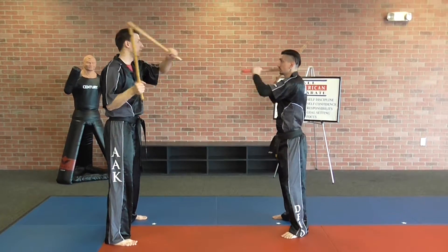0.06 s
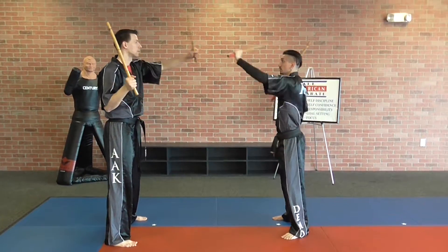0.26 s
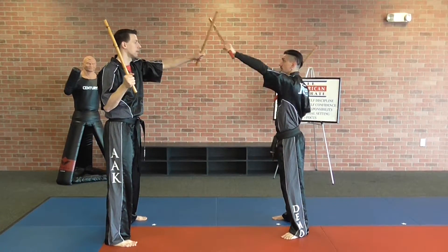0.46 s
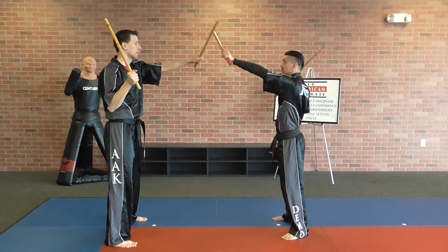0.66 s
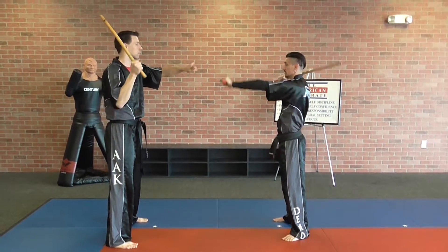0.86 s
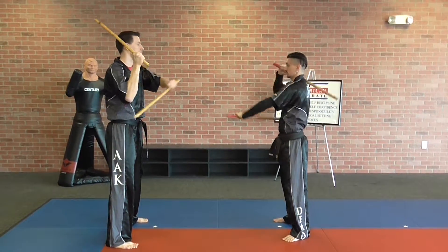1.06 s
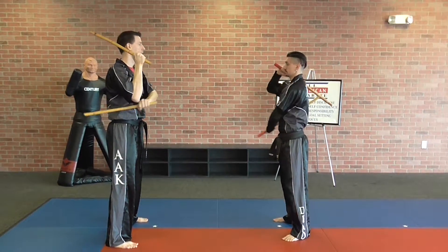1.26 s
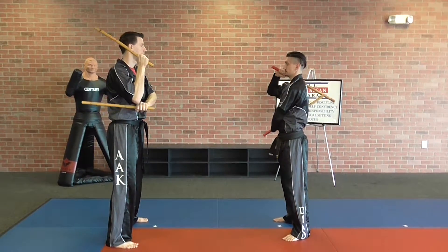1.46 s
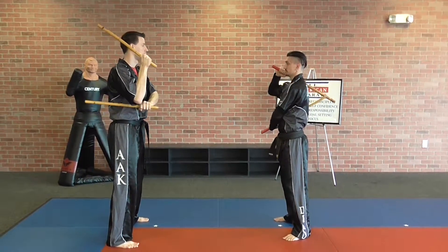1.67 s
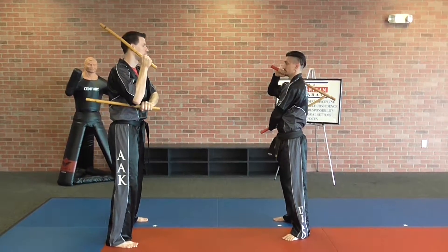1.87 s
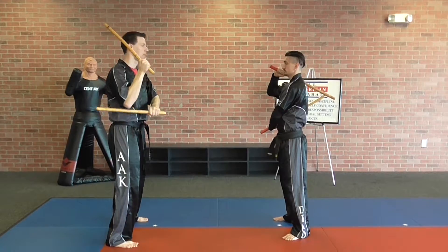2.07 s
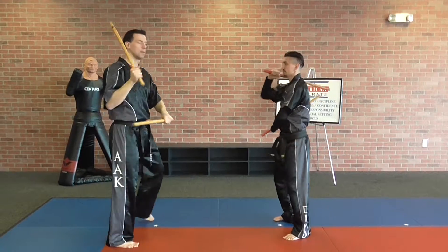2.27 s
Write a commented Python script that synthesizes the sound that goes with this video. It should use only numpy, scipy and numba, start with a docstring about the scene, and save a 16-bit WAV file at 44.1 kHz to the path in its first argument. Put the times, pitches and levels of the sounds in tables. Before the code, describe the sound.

Wooden sticks crack together twice, then clack softly, in an echoing training hall.

```python
"""Hard-walled training hall: two people drill with wooden sticks, two sharp cracks, then a dull clack.
Each contact cracks and rings the wood; the hall adds early echoes and a diffuse tail.
The loudest crack overloads the two microphones with a low thump; a faint hollow drone follows.
Uniforms swish and feet scuff the mat over ventilation rumble. Gain control ducks after each crack."""
import sys
import numpy as np
from scipy import signal
from scipy.fft import rfft, irfft
from scipy.io import wavfile
from numba import njit

SR = 44100
rng = np.random.default_rng(int(sys.argv[2]) if len(sys.argv) > 2 else 0)


def digitize_waveform(pressure):
    """Quantize a signal to 16-bit integers and store it at the path in sys.argv[1].

    Rows of a 2-D input are taken as channels; values are limited to [-1, 1].
    """
    field = np.atleast_2d(pressure).T
    bounded = np.clip(field, -1, 1)
    quanta = np.round(bounded * 32767).astype(np.int16)
    wavfile.write(sys.argv[1], SR, quanta)


N = 101429
BINS_HZ = np.fft.rfftfreq(N, 1 / SR)


def undb(db):
    """Decibels to gain."""
    return 10 ** (np.asarray(db) / 20)


def curve(points):
    """(f/Hz, value) points interpolated over log frequency at each FFT bin."""
    hz, values = np.array(points).T
    return np.interp(np.log(np.maximum(BINS_HZ, 1)), np.log(hz), values)


def noise(spectrum):
    """Unit-rms noise shaped by (f/Hz, relative density/dB) points."""
    x = irfft(rfft(rng.standard_normal(N)) * undb(curve(spectrum)), N)
    return x / x.std()


def stereo(mid, side):
    """Mid/side to left/right."""
    return np.array([mid + side, mid - side])


def delay(x, seconds):
    """Delayed signal, cut to N samples."""
    return np.concatenate([np.zeros(int(seconds * SR)), x])[:N]


def swell(t, peak, rise, fall):
    """Gaussian bump with separate rise and fall widths."""
    return np.exp(-.5 * ((t - peak) / np.where(t < peak, rise, fall)) ** 2)


def fade(t, t60):
    """Exponential decay, 60 dB in t60."""
    return np.exp(-np.log(1000) * t / t60)


# Rumble spectrum: f/Hz, level/dB
RUMBLE_SPECTRUM = [(15, -72.5), (25, -41), (45, -25), (87, -9), (108, -5), (149, 2), (185, -7.5), (242, -8),
                   (439, -18.5), (489, -22.5), (1020, -30.5), (1520, -39), (2760, -49.5), (5280, -49),
                   (16000, -50)]
# Rumble width: f/Hz, side re mid/dB
RUMBLE_WIDTH = [(60, -25), (200, -20), (380, -9), (700, -3), (1300, 2), (4400, 1.5), (8000, -3.5),
                (15000, -5)]
# Bass drift: t/s, level/dB
BASS_DRIFT = [(0, 12.5), (.11, 1), (.16, 0), (.27, -3.5), (.35, 2.5), (.45, -1), (.8, -2.5), (1.15, 0),
              (1.7, -2.5), (2.3, -4.5)]
# Motor hum: f/Hz, rms level/dB
MOTOR_HUM = [(59, -62), (120, -53), (238, -52.5)]


def ventilation(t, rumble_db=-43.5, bass_hz=300):
    """Air rumble with drifting, centred bass and wide hiss, plus motor hum."""
    side = irfft(rfft(noise(RUMBLE_SPECTRUM)) * undb(curve(RUMBLE_WIDTH)), N)
    air = stereo(noise(RUMBLE_SPECTRUM), side)
    bass = signal.sosfiltfilt(signal.butter(2, bass_hz, fs=SR, output="sos"), air)
    bass_gain = undb(np.interp(t, *np.array(BASS_DRIFT).T))
    air += bass * (bass_gain - 1)
    hum = sum(undb(db) * np.sqrt(2) * np.sin(2 * np.pi * (hz * t + rng.random())) for hz, db in MOTOR_HUM)
    return undb(rumble_db) * air + hum


# Wood contacts, rebounds included: t/s, level/dB, contact time/ms, striking spot 0-2
STICK_CONTACTS = [(.2050, -5.5, 0.057, 0), (.2080, 1.5, 0.06, 0), (.4821, 2.5, 0.012, 1),
                  (.4838, 5, 0.07, 1), (.4860, 5.5, 0.033, 1), (1.3597, -17.5, 0.081, 2),
                  (1.3665, -25, 0.12, 2), (1.3755, -26, 0.085, 2), (1.3845, -33, 0.1, 2),
                  (1.39, -28.5, .03, 2), (1.4485, -23, 0.27, 2)]
# Stick modes: f/Hz, t60/s, level/dB at spots 0, 1, 2
STICK_MODES = [(774.6, .025, -14.5, -20.5, -11), (938, .022, -25, -14, -7), (1204, 0.023, -31, -5.5, -11),
               (1440, 0.018, -14, -15.5, -6), (1642, .025, -19, -9, -11.5), (1955, .03, -19, -5.5, -9.5),
               (2121, .028, -23.5, -5, -23), (2505, .022, -9, -19, -18.5), (2981, 0.016, -22, -7, -28),
               (3640, 0.018, -20.5, -12, -34), (3855, .018, -6.5, -24, -41), (4190, 0.022, -5.5, -15, -41),
               (5116, 0.011, -3.5, -6.5, -37), (5675, 0.008, -7, -5.5, -36)]
# Splintery crack spectrum: f/Hz, level/dB at spots 0, 1, 2
CRACK_SPECTRA = [(100.6, -23.5, -9.5, -16), (380, -21, -12, -11), (673, -3, -2.5, 15), (2200, -1, 2.5, 5),
                 (3500, 3.5, 3, -12), (5050, 7.5, 7, 1), (7000, 4, 0.5, -6.5), (10340, -5.5, -1, -14),
                 (15200, 4, -8.5, -32)]


def sticks(t, ring_db=-4.5, crack_db=-4.5, crack_t60_s=.012):
    """Each contact cracks and rings the modes, neighbours in antiphase; longer contact is duller."""
    out, age = np.zeros(N), t[:SR // 8]
    for start, db, contact_ms, spot in STICK_CONTACTS:
        ring = sum((-1) ** n * undb(spot_db[spot]) * np.cos(2 * np.pi * hz * age) * fade(age, t60)
                   for n, (hz, t60, *spot_db) in enumerate(STICK_MODES))
        spectrum = [(hz, spot_db[spot]) for hz, *spot_db in CRACK_SPECTRA]
        crack = noise(spectrum)[:len(age)] * fade(age, crack_t60_s)
        pole = np.exp(-1e3 / (contact_ms * SR))
        blow = signal.lfilter([1 - pole], [1, -pole], undb(ring_db) * ring + undb(crack_db) * crack)
        out += undb(db) * delay(np.pad(blow, (0, N - len(age))), start)
    return out


# Floor, ceiling and wall reflections: delay/s, level/dB, pan (+1 left, -1 right)
REFLECTIONS = [(.0035, -21.5, 0.86), (.0063, -14, -.5), (.0100, -9.5, 0.45), (.0125, -10.5, -0.12),
               (0.0172, -10, .3), (.0180, -12.5, -0.061)]


def hall_echoes(x, cutoff_hz=7500):
    """Dulled first reflections from both sides."""
    dull = signal.sosfilt(signal.butter(2, cutoff_hz, fs=SR, output="sos"), x)
    return sum(undb(db) * delay(dull, lag) * stereo([1], np.array([pan])) for lag, db, pan in REFLECTIONS)


# Tail decay: f/Hz, t60/s
TAIL_DECAY = [(150, 0.87), (600, 0.69), (1500, 0.5221), (4000, 0.6422), (5800, 0.5933), (7500, 0.5),
              (10000, 0.45), (14000, 0.03)]
# Tail spectrum: f/Hz, level/dB
TAIL_SPECTRUM = [(100, 3), (500, 0), (1500, 2.5), (4000, 3), (6500, -3), (9000, -2.5), (15000, -18)]
# Tail width: f/Hz, side re mid/dB
TAIL_WIDTH = [(100, -25), (400, -18.5), (1000, -10), (2500, -7), (12000, -10.5)]


def hall_tail(x, t, level_db=-5.5, build_s=.0055, scatter_db=-.5, scatter_t60_s=.09):
    """Dense early scatter, then diffuse reverberation whose treble dies first."""
    mid_side = rfft(rng.standard_normal((2, N))) * undb(curve(TAIL_SPECTRUM))
    mid_side[1] *= undb(curve(TAIL_WIDTH))
    tail = np.zeros((2, N))
    for centre_hz, t60 in TAIL_DECAY:
        band = curve([(hz, float(hz == centre_hz)) for hz, _ in TAIL_DECAY])
        tail += irfft(mid_side * band, N) * fade(t, t60)
    tail *= 1 - np.exp(-t / build_s)
    tail *= 1 + undb(scatter_db) * fade(t, scatter_t60_s)
    response = stereo(*tail) / np.linalg.norm(tail[0])
    return undb(level_db) * signal.fftconvolve(x[None], response, axes=1)[:, :N]


# Sleeve swishes: peak t/s, rise/s, fall/s, level/dB
SLEEVE_SWISHES = [(.44, 0.052, 0.12, -48.5), (.87, .04, 0.043, -55), (0.989, .05, 0.051, -59.5),
                  (1.279, 0.023, 0.016, -63.5)]
# Cloth spectrum: f/Hz, level/dB
CLOTH_SPECTRUM = [(500, -9), (2500, -4.5), (4500, 8.5), (8000, 0.5), (11000, -6.5), (16000, -21)]


def uniforms(t):
    """Sleeves swish as the arms swing."""
    envelope = sum(undb(db) * swell(t, peak, rise, fall) for peak, rise, fall, db in SLEEVE_SWISHES)
    return noise(CLOTH_SPECTRUM) * envelope


# Hollow drone partials: t/s, length/s, f/Hz, level/dB
DRONE_PARTIALS = [(.512, 0.074, 315, -27.5), (0.516, 0.058, 418, -24.5), (.555, 0.16, 427, -34),
                  (0.554, .165, 495, -36.5), (.555, 0.056, 572, -27.5), (.665, 0.058, 572, -37.5),
                  (0.532, 0.067, 638, -32), (0.48, 0.22, 208, -36)]


def drone(t, edge_s=.022, waver_depth=.02):
    """Low, wavering partials sound briefly after the hardest blow."""
    out = np.zeros(N)
    for start, length, hz, db in DRONE_PARTIALS:
        gate = np.clip(np.minimum(t - start, start + length - t) / edge_s, 0, 1)
        waver = 1 + waver_depth * noise([(30, -1), (120, -56), (500, -120)])
        out += undb(db) * gate * np.sin(2 * np.pi * np.cumsum(hz * waver) / SR)
    return out


# Overload thump spectrum: f/Hz, level/dB
THUMP_SPECTRUM = [(30, -12), (160, 1), (300, -6.5), (700, -13), (2000, -28.5), (8000, -54.5)]


def overload_thump(t, start_s=.4838, t60_s=.025, mid_db=-19.5, side_db=-14):
    """Short, low, wide thump as the loudest crack overloads the two microphones unequally."""
    mid = undb(mid_db) * noise(THUMP_SPECTRUM) * fade(t, t60_s)
    side = undb(side_db) * noise(THUMP_SPECTRUM) * fade(t, t60_s)
    return stereo(delay(mid, start_s), delay(side, start_s))


# Mat scuffs: peak t/s, rise/s, fall/s, hiss level/dB, thud level/dB
MAT_SCUFFS = [(2.066, .002, .01, -60, -52.5), (2.099, 0.0014, 0.0064, -64, -50),
              (2.121, 0.014, 0.019, -47.5, -47), (2.193, 0.017, 0.033, -50.5, -58.5),
              (2.272, 0.012, 0.026, -52.5, -44)]
# Scuff hiss spectrum: f/Hz, level/dB
HISS_SPECTRUM = [(300, -12), (1800, 5), (3000, -3), (5000, 7.5), (8000, 2.5), (12000, -4.5), (16000, -10)]
# Scuff thud spectrum: f/Hz, level/dB
THUD_SPECTRUM = [(100, -4.5), (350, 6.5), (700, 0), (1400, -5.5), (2500, -26), (8000, -39.5)]


def feet(t, grain_db=1.3):
    """Feet scuff the mat: grainy hiss with a soft thud."""
    hiss = noise(HISS_SPECTRUM) * undb(grain_db * noise([(200, 0), (800, -33), (3000, -80)]))
    thud = noise(THUD_SPECTRUM)
    return sum(swell(t, peak, rise, fall) * (undb(hiss_db) * hiss + undb(thud_db) * thud)
               for peak, rise, fall, hiss_db, thud_db in MAT_SCUFFS)


def scene(side_gain=.33, side_highpass_hz=800, quiet_send_db=-6):
    """Blows and quieter sounds in the hall, over the ventilation."""
    t = np.arange(N) / SR
    blows = sticks(t)
    quiet = drone(t) + uniforms(t) + feet(t)
    highpass = signal.butter(1, side_highpass_hz, "high", fs=SR, output="sos")
    side = signal.sosfilt(highpass, uniforms(t) + feet(t))  # independent noise for width
    direct = blows + overload_thump(t) + stereo(quiet, side_gain * side)
    send = blows + undb(quiet_send_db) * quiet
    return direct + hall_echoes(send) + hall_tail(send, t) + ventilation(t)


@njit
def follow(x, attack_s, release_s):
    """One-pole level follower with separate attack and release."""
    out, level = np.empty(len(x)), 0.
    for i in range(len(x)):
        level += (x[i] - level) / (SR * (attack_s if x[i] > level else release_s))
        out[i] = level
    return out


def record(dry):
    """Gain control ducks after loud peaks; soft clip, then low-pass."""
    threshold_db, ratio, ceiling, cutoff_hz = -18.5, 4.8, .62, 16000
    level = follow(np.abs(dry).max(axis=0), attack_s=.0029, release_s=.23)
    gain = np.maximum(level / undb(threshold_db), 1) ** (1 / ratio - 1)
    clipped = ceiling * np.tanh(dry * gain / ceiling)
    return signal.sosfilt(signal.ellip(8, .2, 70, cutoff_hz, fs=SR, output="sos"), clipped)


dry = scene()
out = record(dry)
digitize_waveform(out)
```